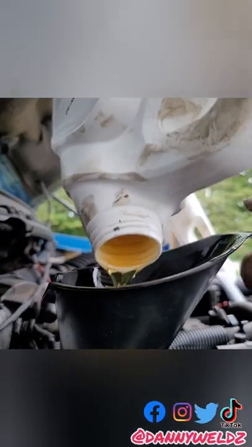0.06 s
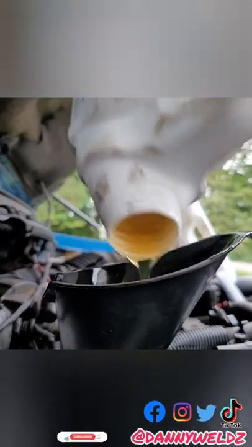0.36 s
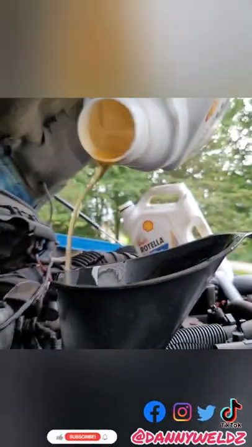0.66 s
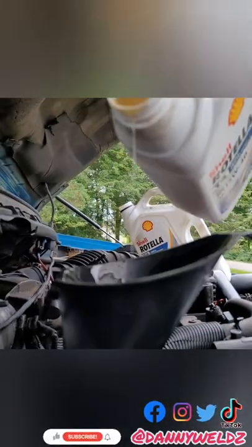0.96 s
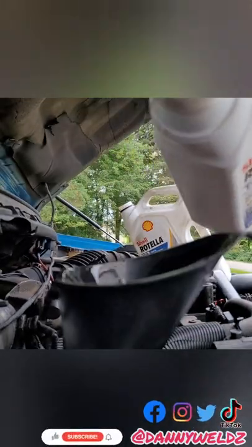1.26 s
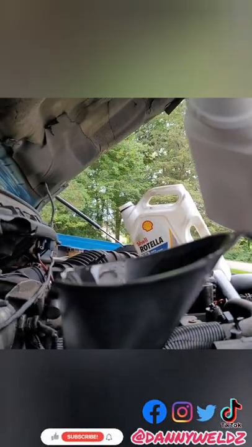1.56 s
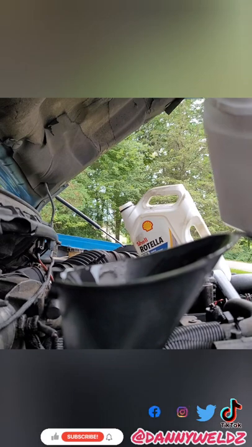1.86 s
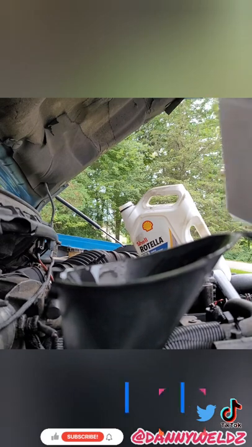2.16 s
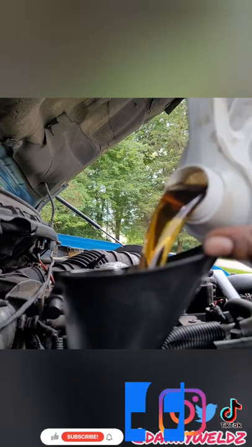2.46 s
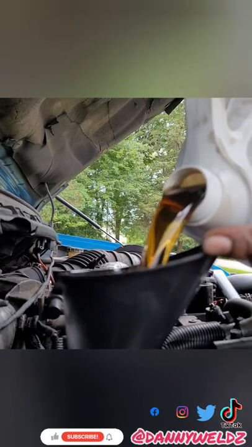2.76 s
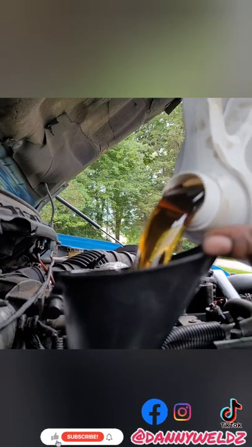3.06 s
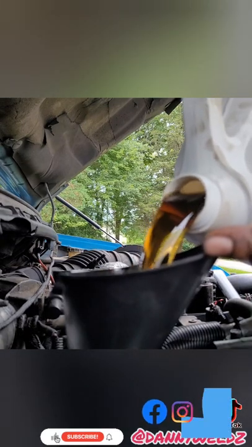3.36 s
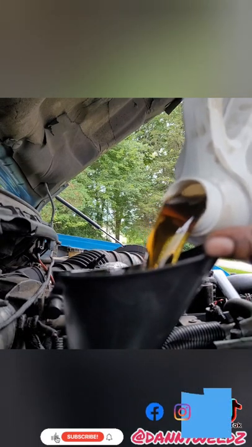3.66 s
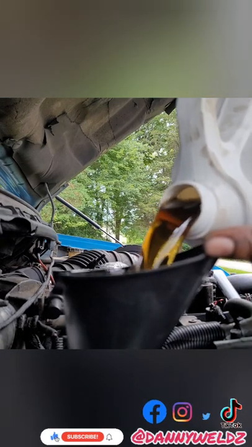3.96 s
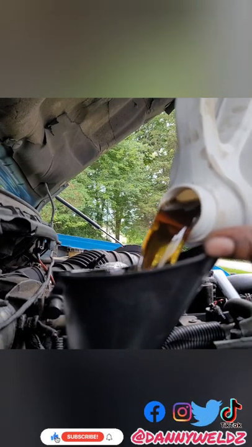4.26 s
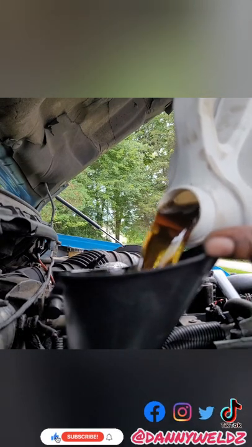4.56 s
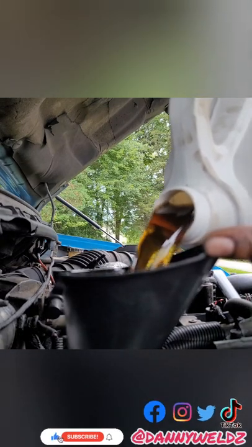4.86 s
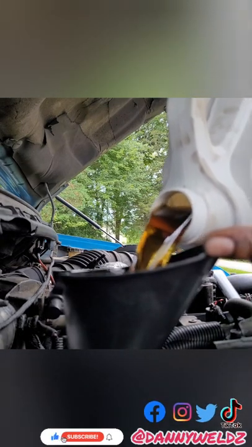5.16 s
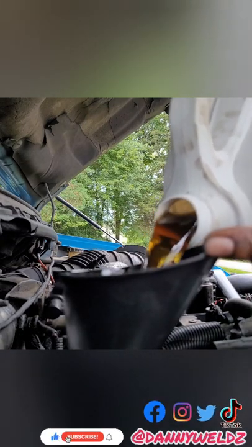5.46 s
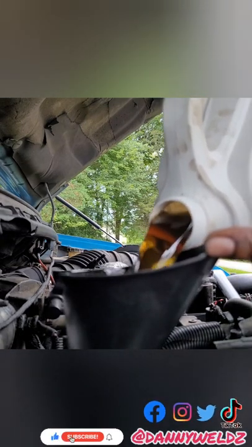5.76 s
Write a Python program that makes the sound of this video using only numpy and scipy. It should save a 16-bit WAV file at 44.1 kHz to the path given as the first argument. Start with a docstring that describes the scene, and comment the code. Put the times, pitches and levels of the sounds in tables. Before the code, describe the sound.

Outdoors, distant insects chirr throughout over a soft wash of air. At about 0.2 seconds, a plastic jug knocks against a funnel close by, a quick, hollow rattle with a low thump. From 0.5 to 0.8 seconds come lighter taps, and oil slops and glugs, with tiny fizzing snaps and a faint rub of the jug in the hand. Meanwhile a car passes on a nearby road, its tyre roar, rumble and fluttering exhaust closest around 1.4 seconds. At about 2.2 seconds all sound drops out for an instant, and the car is gone, the insects slightly softer. From 2.4 seconds thick oil runs into the funnel with a barely audible trickle. A few soft plops come around 3.8 to 4 seconds and again near 5.7, while a far motor drones low and faint to the end.

```python
"""Oil is poured from a plastic jug into a funnel on an engine, outdoors, with insects chirring throughout.
First the jug knocks on the funnel as it is lifted, then its oil slops and glugs.
Next a car passes on a road nearby, until all sound drops out for an instant and the car is gone.
Last, the thick oil runs almost silently, with a few soft plops, while a far motor drones."""
import sys
import numpy as np
from scipy import signal
from scipy.fft import rfft, irfft, next_fast_len
from scipy.io import wavfile
from scipy.ndimage import uniform_filter1d

SR = 44100
rng = np.random.default_rng(int(sys.argv[2]) if len(sys.argv) > 2 else 0)


def to_wav(s):
    """Save 16-bit WAV."""
    ch = np.atleast_2d(s).T  # columns
    pcm = np.round(np.clip(ch, -1, 1) * 32767)  # PCM
    wavfile.write(sys.argv[1], SR, pcm.astype(np.int16))


N = 260631
PADDED = next_fast_len(N, real=True)
TIME, FREQS = np.arange(N) / SR, np.fft.rfftfreq(PADDED, 1 / SR)
GAP_START_S, GAP_END_S = 2.236, 2.25
CAR_LAG_MS, YARD_LAG_MS, JUG_LAG_MS = 0.29, 0.355, -0.365  # how much later the right ear hears each

# How far the jug, the car and the open air lean to the left: pitch_hz, left_minus_right_db
JUG_SIDE = [(100, 3.5), (400, -5), (1200, -6), (2200, 0.5), (3400, -7), (5000, 0), (8000, -3.5),
            (13000, 3.5)]
CAR_SIDE = [(100, 1.5), (380, -2), (800, -1), (1200, 1), (2300, -0.5), (3300, -2.5), (5000, -0.5),
            (8000, -0.5), (14000, 4.5)]
AIR_SIDE = [(100, -0.5), (500, -2), (1300, 0.5), (3000, -2.5), (5000, 0), (6500, 0), (7700, -5.5),
            (8500, -2), (12000, 9.5)]


def knocks(hard_db=-20, heavy_db=-21):
    """The jug knocks on the funnel: harder hits sound brighter, heavier ones clatter longer."""
    # A rattle, then light taps: start_s, clatter_db, ring_db
    hits = [(.2018, -19.5, -23), (0.2129, -20, -17), (0.223, -23.5, -22), (.240, -25.5, -22.5),
            (.263, -40, -23), (.279, -27, -20.5), (0.552, -36, -39), (0.6009, -24, -55), (0.64, -31, -38)]
    out = np.zeros((2, N))
    for start_s, clatter_db, ring_db in hits:
        tilt = 0.4 * (clatter_db - hard_db)
        stretch = 2 ** ((ring_db - heavy_db) / 26)  # 26 dB more ring doubles the clatter time
        add(out, start_s, plastic_hit(clatter_db, ring_db, tilt, stretch))
    return out


def plastic_hit(clatter_db, ring_db, tilt_db_per_octave, stretch, ring_trim_db=-5, size=16384):
    """One hit makes a short, noisy clatter and sets the hollow plastic ringing."""
    # Tone of the clatter: pitch_hz, level_db
    clatter_tone = [(150, -46.5), (250, -5), (436, -4.5), (708, -2.5), (772, -9.5), (1210, 2.5),
                    (1660, -8.5), (1840, -4.5), (2650, -12), (3370, -6.5), (4080, -19.5), (8030, -24.5),
                    (15800, -37.5)]
    # Time the clatter takes to fade by 60 dB: pitch_hz, fade_s
    clatter_fades = [(300, 0.36), (1200, 0.2), (3400, 0.14), (12000, 0.19)]
    # Notes of the jug and funnel: pitch_hz, level_db, fade_s
    notes = [(107, 0.5, 0.21), (169, -2.5, 0.26), (204, 2, 0.228), (238.8, -8, 0.11), (358, -8, 0.286),
             (463, -21.5, 0.18), (704, -10.5, 0.044), (871.7, -0.5, 0.14), (1231, -1, 0.14),
             (1760, -11, 0.16), (2180, -24, 0.14), (3000, -15.5, 0.089), (3440, -9, 0.071),
             (4200, -18.5, 0.11)]
    t, hz = TIME[:size], np.fft.rfftfreq(size, 1 / SR)
    tone_db = curve(clatter_tone, hz) + tilt_db_per_octave * np.log2(hz / 1000 + 0.16)
    burst = noise(tone_db, JUG_SIDE, JUG_LAG_MS, size)
    # Split the noise into bands so that each fades at its own speed.
    band_hz, age_s, bands = signal.stft(burst, SR, nperseg=128)
    bands = bands * gain_of(-60 * age_s / stretch / curve(clatter_fades, band_hz)[:, None])
    clatter = signal.istft(bands, SR, nperseg=128)[1][:, :size]
    ear_time = t - np.array([[0], [JUG_LAG_MS]]) / 1000
    ring = np.zeros((2, size))
    for pitch_hz, db, fade_s in notes:
        wave = np.sin(2 * np.pi * (pitch_hz * ear_time + rng.random()))
        ring += panned(curve(JUG_SIDE, pitch_hz)) * gain_of(db - 60 * t / fade_s) * wave
    onset = 1 - np.exp(-t / 0.00087)
    return (gain_of(clatter_db) * clatter + gain_of(ring_db + ring_trim_db) * ring) * onset


def thumps(side_db=-2):
    """The weight of the full jug shifts: a few deep cycles swell and die."""
    # Shifts of weight: start_s, pitch_hz, level_db, length_s
    shifts = [(0.2017, 63, -13.5, 0.081), (0.329, 83.3, -29, 0.15), (1.871, 60.3, -39.5, 0.14)]
    out = np.zeros((2, N))
    for start_s, hz, db, length_s in shifts:
        t = TIME[TIME < length_s]
        swell = np.sin(np.pi * t / length_s)
        add(out, start_s, gain_of(db) * panned(side_db) * swell * np.sin(2 * np.pi * hz * t))
    return out


def bubbles(fade_at_700_hz_s=0.049, side_db=-2):
    """Air bubbles in the oil ring and splat on the funnel; bigger, lower ones ring longer."""
    # Glugs, then soft plops: start_s, pitch_hz, level_db, glide_octaves_per_s
    plops = [(.601, 1000, -23, 5), (0.605, 754, -23, 27), (0.648, 140, -23, 1), (0.75, 648, -18.5, 7),
             (3.768, 670, -45.5, 4), (3.858, 540, -51, -4), (3.885, 950, -53, 19), (4.022, 477, -51.5, 0),
             (4.047, 940, -50, -4), (5.649, 1334, -50.5, -5), (5.653, 750, -49.5, -28),
             (5.655, 174, -49.5, 0)]
    out, t = np.zeros((2, N)), TIME[:8192]
    onset = 1 - np.exp(-t / 0.003)
    for start_s, hz, db, glide in plops:
        fade_s = fade_at_700_hz_s * np.sqrt(700 / hz)
        wave = np.sin(2 * np.pi * np.cumsum(hz * 2 ** (glide * t)) / SR) * onset
        add(out, start_s, gain_of(db - 60 * t / fade_s) * panned(side_db) * wave)
        splat = plastic_hit(clatter_db=db - 11, ring_db=db - 22, tilt_db_per_octave=-2, stretch=0.4)
        add(out, start_s, splat)
    return out


def slosh(peak_s=0.69, peak_db=-36.5, rise_db_per_s=16, fall_db_per_s=49, lumpy_db=3):
    """Oil slops in the jug, swelling as it tips and then settling."""
    # Ringing hollows of the jug: pitch_hz, width_hz, level_db
    hollows = [(348, 172, -8.5), (459.8, 28, 2), (774, 80, -2), (1243, 55, -6)]
    since = TIME - peak_s
    db = peak_db + np.minimum(rise_db_per_s * since, -fall_db_per_s * since)
    return noise(humps(hollows, FREQS), CAR_SIDE, YARD_LAG_MS) * gain_of(db + lumpy_db * waver(27))


def snaps(fade_s=0.033, size=8192):
    """The film of oil at the spout breaks with a short, grainy fizz."""
    # Breaks of the film: start_s, level_db
    breaks = [(0.5403, -37.5), (0.635, -37), (0.703, -44), (.8175, -48)]
    # Tone of the fizz: pitch_hz, level_db
    fizz_tone = [(3000, -9), (6000, -6), (9000, -2), (13000, -3), (15800, -5)]
    out = np.zeros((2, N))
    t, hz = TIME[:size], np.fft.rfftfreq(size, 1 / SR)
    for start_s, db in breaks:
        fizz = noise(curve(fizz_tone, hz), JUG_SIDE, JUG_LAG_MS, size)
        grain = unit_level(uniform_filter1d(rng.exponential(1, size) ** 2, size=30))
        add(out, start_s, gain_of(db - 60 * t / fade_s) * fizz * grain)
    return out


def swishes(grain_db=2):
    """The oily jug rubs in the hand, hissing softly with each move, and the oil film at the spout sizzles
    briefly."""
    # Slides and turns of the jug, and at 0.566 s and 0.768 s sizzles of the oil film at the spout: middle_s,
    # half_length_s, level_db
    moves = [(.38, .08, -61), (0.566, 0.024, -44.5), (0.768, 0.12, -55), (1.47, .05, -66),
             (1.95, 0.13, -59.5)]
    # Tone of the rubbing: pitch_hz, level_db
    rub_tone = [(3000, -20), (6000, 2), (9000, -2), (12500, -2), (15800, -4.5)]
    level = sum(gain_of(db) * np.exp(-((TIME - s) / half_s) ** 2) for s, half_s, db in moves)
    return noise(curve(rub_tone, FREQS), JUG_SIDE, JUG_LAG_MS) * level * gain_of(grain_db * waver(200))


def trickle(start_s=2.4, bubbles_per_s=30, quietest_db=-73, low_hz=700, high_hz=1600, fade_s=0.022):
    """Tiny bubbles ring at random moments where the stream folds into the funnel."""
    out, t = np.zeros((2, N)), TIME[:2048]
    span_s = TIME[-1] - start_s
    onset = 1 - np.exp(-t / 0.001)
    for when, pitch, strength, side in rng.random((round(bubbles_per_s * span_s), 4)):
        hz = low_hz * (high_hz / low_hz) ** pitch
        wave = np.sin(2 * np.pi * hz * t * (1 + 2 * t)) * onset
        level = gain_of(quietest_db + 6.7 * strength ** 2 - 60 * t / fade_s)
        add(out, start_s + when * span_s, level * panned(8 * (side - 0.5)) * wave)
    return out


def car(firing_hz=85, sag_hz_per_s=1.19, flutter_db=5, wander=0.0205):
    """A car passes with tyre roar, road rumble and a fluttering, slowly falling exhaust note."""
    # Tone of the road rumble: pitch_hz, level_db
    road_tone = [(20, -15.5), (40, -7), (60, -1.5), (100, 1), (160, -6.5), (260, -4), (350, -9), (480, -9),
                 (800, -11), (1300, -19.5), (3000, -54.5)]
    # Parts of the exhaust note: pitch_multiple, level_db
    harmonics = [(1, 3), (2, -16), (3, -6)]
    rumble = noise(curve(road_tone, FREQS), CAR_SIDE, CAR_LAG_MS)
    rumble *= gain_of(passing(beside_db=-39, far_loss_db=-1.26, leaving_db_per_s=12.6))
    hz = firing_hz - sag_hz_per_s * since_pass()
    exhaust = drone(hz * (1 + wander * waver(24)), harmonics)
    exhaust *= gain_of(passing(beside_db=-41, far_loss_db=10) + flutter_db * waver(14))
    return tyres() + rumble + exhaust


def tyres(bay_db=-3, echo_gain=0.55, right_sooner_ms=0.25):
    """Tyre roar rings in the engine bay and bounces off the raised hood as the car moves."""
    # Tone of the roar: pitch_hz, level_db
    roar_tone = [(350, -34.5), (600, -4.5), (707, -2.5), (1400, -1.5), (1670, -0.5), (1920, -10),
                 (2590, -10.5), (3190, -11.5), (4310, -19.5), (5900, -23.5), (6950, -20.5), (10300, -37),
                 (15800, -45)]
    # Ringing of the engine bay: pitch_hz, width_hz, level_db, left_minus_right_db
    bay_notes = [(970, 37, 1.5, -1), (1440, 136, -5, -14), (1834, 147, -1.5, -2.5), (1950, 110, -3, 1.5),
                 (2175, 59, -3, 3.5), (3115, 110, -9.5, 0.5), (3274, 220, -13.5, 1)]
    # Changing echo off the hood: time_s, delay_ms
    hood_echo = [(0, 3.03), (.8, 2.81), (1.55, 2.23), (2.23, 2.54)]
    # Whine of the tread: pitch_hz, width_hz, level_db
    tread_band = [(1212, 260, 0.5)]
    bay_tone = np.array([humps([(hz, width, db + ear * side) for hz, width, db, side in bay_notes], FREQS)
                         for ear in (0.5, -0.5)])
    roar = noise(curve(roar_tone, FREQS), CAR_SIDE, CAR_LAG_MS)
    roar += gain_of(bay_db) * noise(bay_tone, CAR_SIDE, CAR_LAG_MS)
    delay_ms = np.interp(TIME, *np.transpose(hood_echo))
    echo = np.array([np.interp(TIME - ms / 1000, TIME, ear)
                     for ear, ms in zip(roar, (delay_ms, delay_ms - right_sooner_ms))])
    roar_db = passing(beside_db=-37.5, far_loss_db=3.93, leaving_db_per_s=6.5) + 0.5 * waver(25)
    tread = noise(humps(tread_band, FREQS), CAR_SIDE, CAR_LAG_MS)
    tread_db = passing(beside_db=-40, far_loss_db=11.9, leaving_db_per_s=-2)
    return gain_of(roar_db) * unit_level(roar + echo_gain * echo) + gain_of(tread_db) * tread


def passing(beside_db, far_loss_db, leaving_db_per_s=0, speed_m_per_s=22, road_m=5.5):
    """Level in dB of one car sound as it nears and leaves; a negative loss is a gain."""
    nearness = road_m / np.hypot(road_m, speed_m_per_s * since_pass())
    return beside_db - far_loss_db * (1 - nearness) - leaving_db_per_s * np.maximum(since_pass(), 0)


def since_pass(closest_s=1.35):
    """Seconds since the car was closest, negative before then."""
    return TIME - closest_s


def far_motor(start_hz=88.3, rise_hz_per_s=0.527, start_db=-56.5, rise_db_per_s=0.86, swell_db=1.5):
    """A far motor drones, swelling and sinking; after the gap it slowly picks up."""
    # Parts of the drone: pitch_multiple, level_db
    harmonics = [(1, -2), (2, -20)]
    since = np.maximum(TIME - GAP_END_S, 0)
    hz = (start_hz + rise_hz_per_s * since) * (1 + 0.0063 * waver(11.6))
    return drone(hz, harmonics) * gain_of(start_db + rise_db_per_s * since + swell_db * waver(6))


def open_air(rumble_db=-56, wash_db=-63.5):
    """The outdoors: a low rumble under a soft wash of air."""
    # Tone of the rumble: pitch_hz, level_db
    rumble_tone = [(20, -20.5), (38, -14.5), (54, 5.5), (76, -10), (104, 2), (135, -7.5), (170, -17),
                   (280, -17.5), (380, -26.5), (800, -59)]
    # Tone of the wash: pitch_hz, level_db
    wash_tone = [(180, -26), (300, -8), (424, -9), (684, -6.5), (779, -4), (896, -3), (1130, -8),
                 (1240, -2.5), (1610, -9), (2230, -15.5), (2740, -22), (4000, -25), (5200, -51.5),
                 (8800, -120)]
    rumble = gain_of(rumble_db) * noise(curve(rumble_tone, FREQS), AIR_SIDE, YARD_LAG_MS)
    wash = gain_of(wash_db + 0.5 * waver(21)) * noise(curve(wash_tone, FREQS), AIR_SIDE, YARD_LAG_MS)
    return rumble + wash


def insects(level_db=-57, throb_db=0.5, early_boost_db=3.5):
    """Many far insects blend into a slightly throbbing chirr, louder before the gap."""
    # Insect choruses: pitch_hz, width_hz, level_db
    choruses = [(4690, 550, -16.5), (5310, 833, -17.5), (6090, 43, -8.5), (6736, 486, -2.5), (7140, 500, 1),
                (7640, 610, -6), (8340, 460, -19), (8475, 36, -6.5), (9000, 230, -29)]
    chirr = noise(humps(choruses, FREQS), AIR_SIDE, YARD_LAG_MS)
    return chirr * gain_of(level_db + throb_db * waver(52) + early_boost_db * (TIME < GAP_START_S))


def hiss(level_db=-82):
    """A faint, steady, very high hiss."""
    # Tone of the hiss: pitch_hz, level_db
    hiss_tone = [(3000, -17), (6000, -25), (15800, 32)]
    return gain_of(level_db) * noise(curve(hiss_tone, FREQS), AIR_SIDE, YARD_LAG_MS)


def noise(tone_db, side, lag_ms, size=PADDED):
    """Stereo noise with a given tone, left-right balance and delay between the ears."""
    # How alike the two ears' sounds are: pitch_hz, likeness
    ear_likeness = [(130, 0.94), (260, 0.99), (450, 0.075), (800, 0.44), (1700, 0.43), (3000, 0.093),
                    (8000, 0.066), (15000, 0.143)]
    hz = np.fft.rfftfreq(size, 1 / SR)
    left, other = rfft(rng.standard_normal((2, size)))
    alike = curve(ear_likeness, hz)
    right = alike * left * np.exp(-2j * np.pi * hz * lag_ms / 1000) + np.sqrt(1 - alike ** 2) * other
    spectrum = np.array([left, right]) * gain_of(tone_db) * panned(curve(side, hz))
    return unit_level(irfft(spectrum, size)[:, :N])


def drone(hz, harmonics):
    """An engine note: pure tones at multiples of its firing rate."""
    turns = np.cumsum(hz) / SR
    return unit_level(sum(gain_of(db) * np.sin(2 * np.pi * k * turns) for k, db in harmonics))


def waver(rate_hz):
    """A random wobble, mostly slower than rate_hz."""
    spectrum = rfft(rng.standard_normal(PADDED)) * np.exp(-(FREQS / rate_hz) ** 2)
    return unit_level(irfft(spectrum, PADDED)[:N])


def humps(peaks, hz):
    """A tone curve in dB with a rounded hump at each peak."""
    power = sum(gain_of(db) ** 2 * 2 ** -((2 * (hz - f) / width) ** 2) for f, width, db in peaks)
    return 10 * np.log10(power + 1e-9)


def curve(points, hz):
    """Joins (pitch_hz, value) points, giving each octave equal room."""
    pitches, values = np.transpose(points)
    return np.interp(np.log(hz + 1), np.log(pitches + 1), values)


def gain_of(db):
    """Turns decibels into a multiplier."""
    return 10 ** (np.asarray(db) / 20)


def panned(side_db):
    """Left and right gains for a level difference."""
    return gain_of(np.array([[0.5], [-0.5]]) * side_db)


def unit_level(x):
    """Scales a signal to an average (rms) level of 1."""
    return x / np.sqrt(np.mean(x ** 2) + 1e-20)


def add(mix, start_s, sound):
    """Mixes a sound in from start_s."""
    part = mix[..., round(start_s * SR):][..., :sound.shape[-1]]
    part += sound[..., :part.shape[-1]]


def scene():
    """Jug and oil over the outdoor background; the car is heard only before the gap."""
    faint_hiss = hiss()
    jug = knocks() + thumps() + swishes()
    oil = slosh() + bubbles() + snaps() + trickle()
    return jug + oil + car() * (TIME < GAP_START_S) + far_motor() + open_air() + insects() + faint_hiss


def record(dry, cutoff_hz=15850):
    """Silences the brief gap and removes the very highest treble."""
    sounding = (TIME < GAP_START_S) | (TIME > GAP_END_S)
    gate = uniform_filter1d(sounding.astype(float), size=60)
    low_pass = signal.firwin(511, cutoff_hz, window=("kaiser", 9), fs=SR)
    return signal.oaconvolve(dry * gate, low_pass[None], "same")


dry = scene()
out = record(dry)
to_wav(out)
```